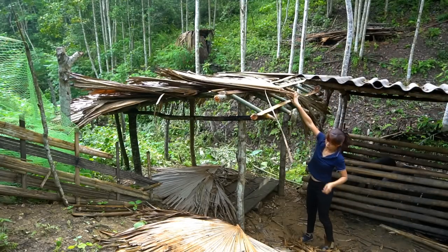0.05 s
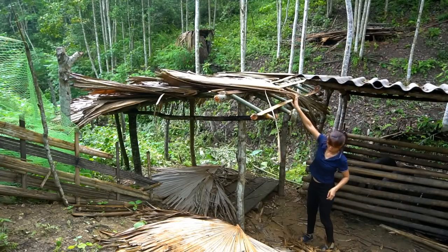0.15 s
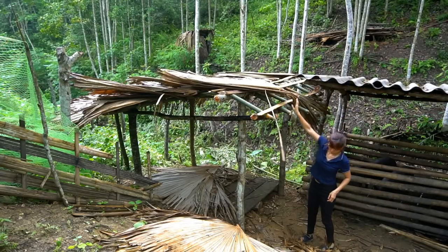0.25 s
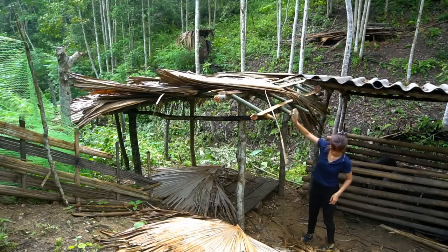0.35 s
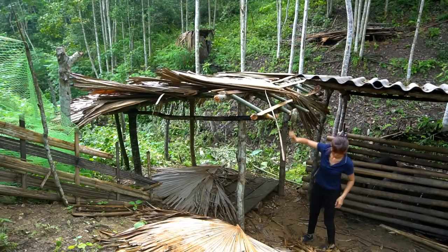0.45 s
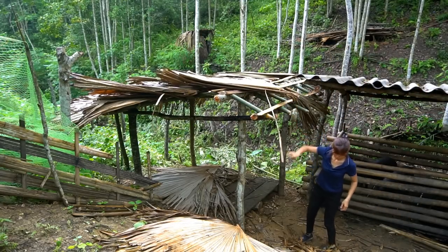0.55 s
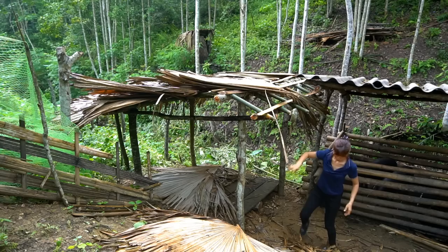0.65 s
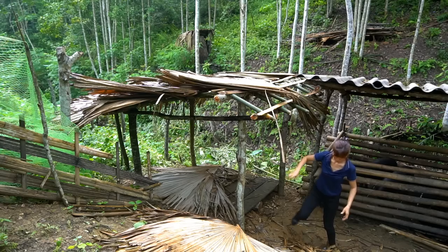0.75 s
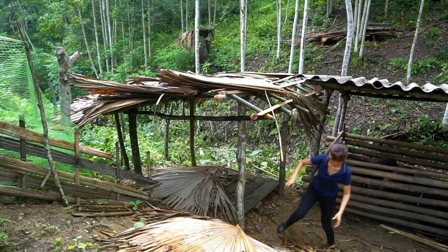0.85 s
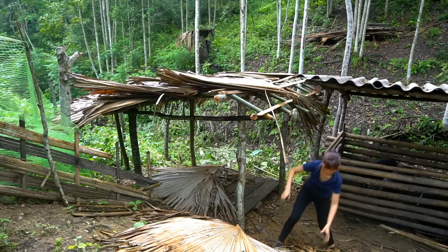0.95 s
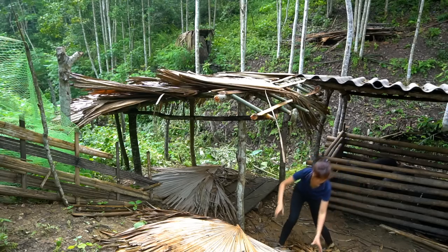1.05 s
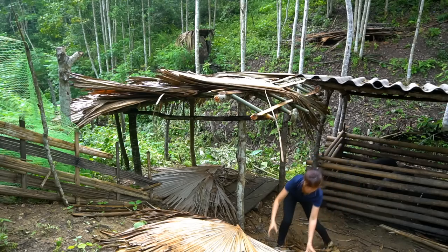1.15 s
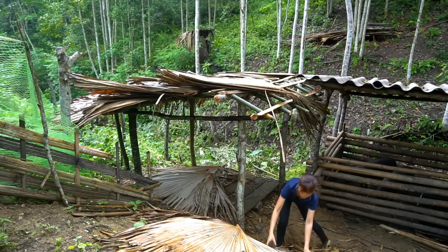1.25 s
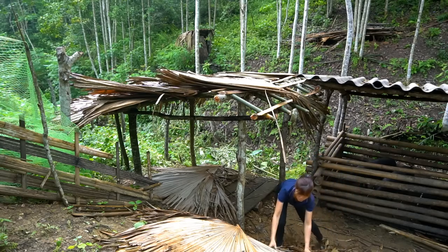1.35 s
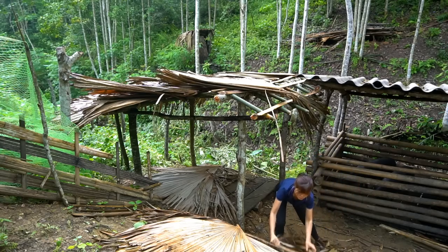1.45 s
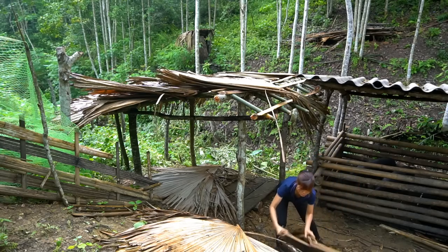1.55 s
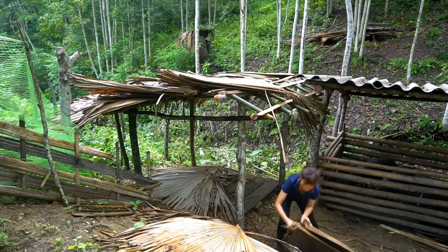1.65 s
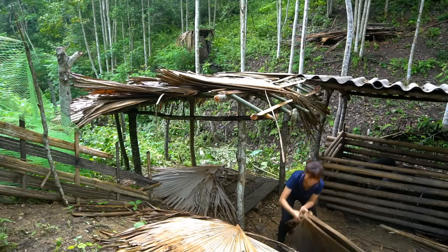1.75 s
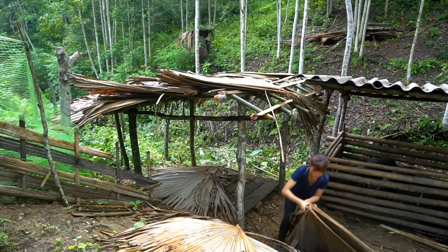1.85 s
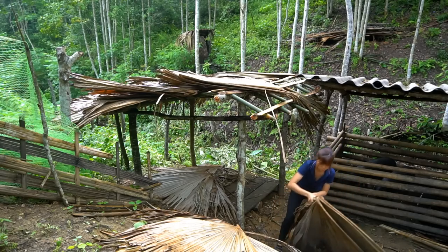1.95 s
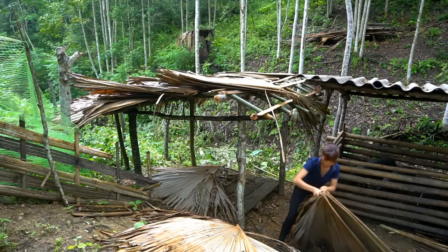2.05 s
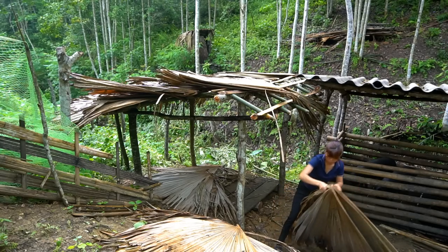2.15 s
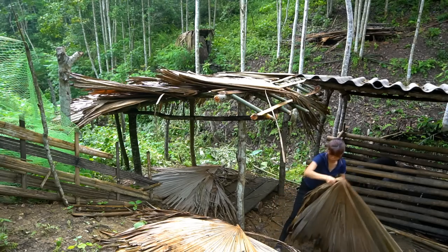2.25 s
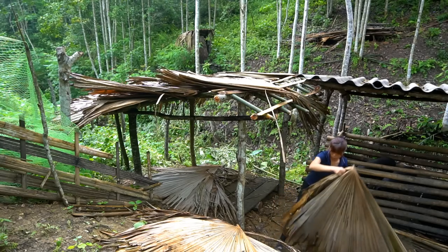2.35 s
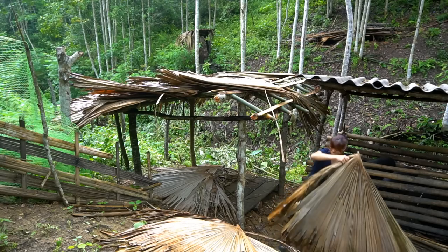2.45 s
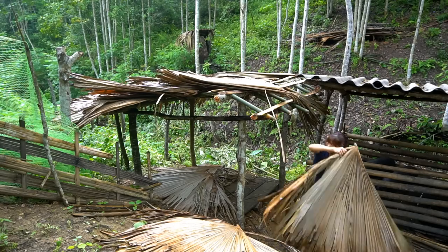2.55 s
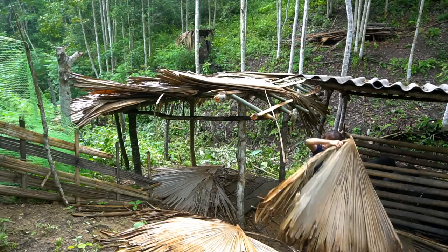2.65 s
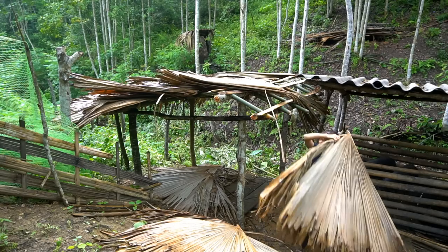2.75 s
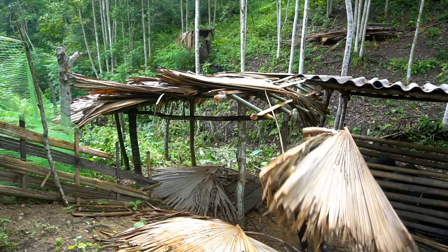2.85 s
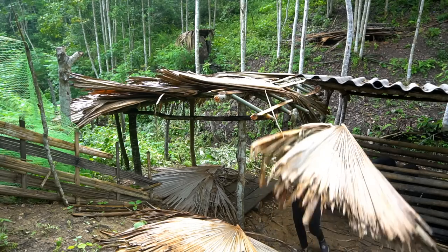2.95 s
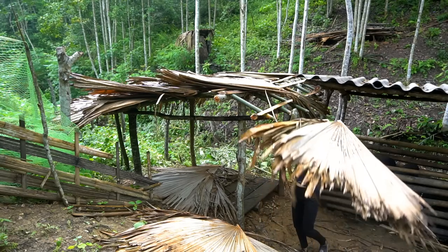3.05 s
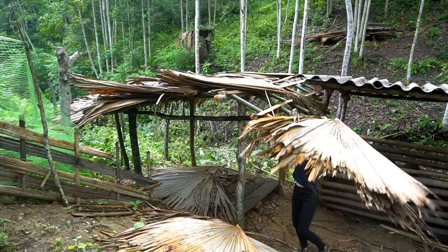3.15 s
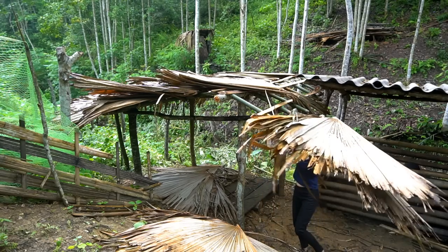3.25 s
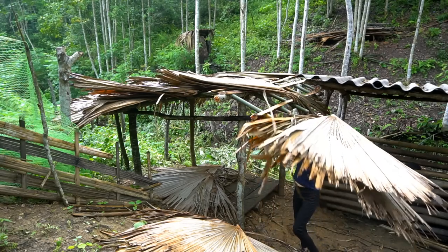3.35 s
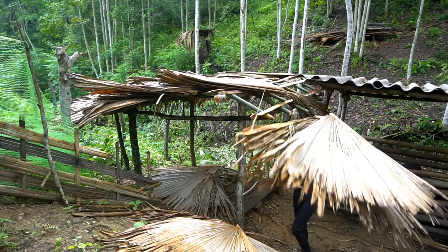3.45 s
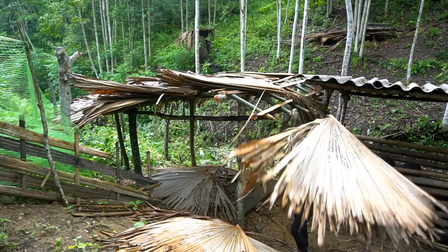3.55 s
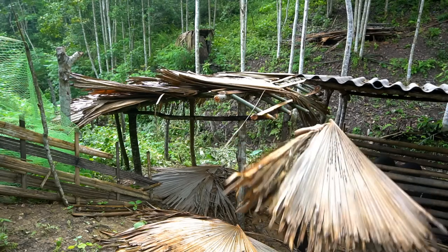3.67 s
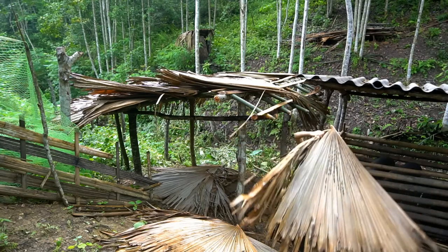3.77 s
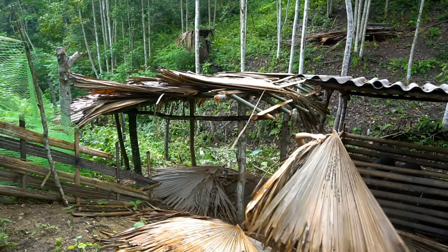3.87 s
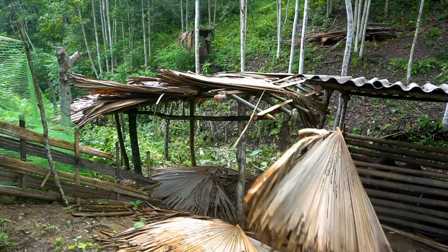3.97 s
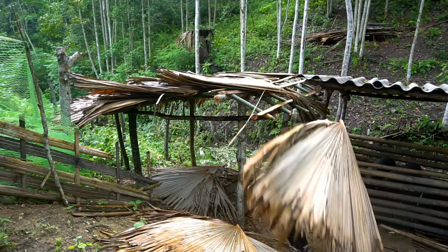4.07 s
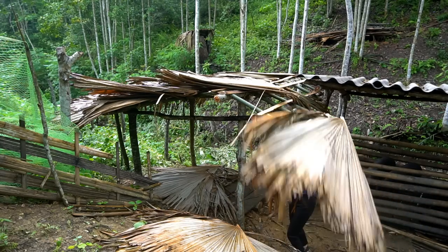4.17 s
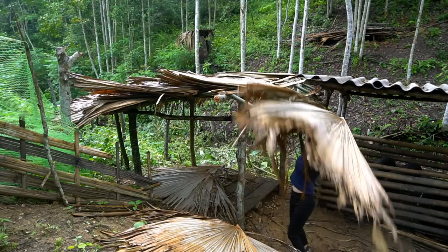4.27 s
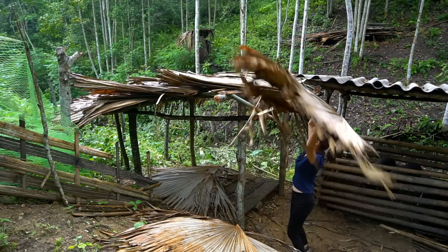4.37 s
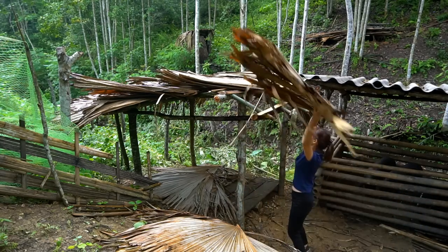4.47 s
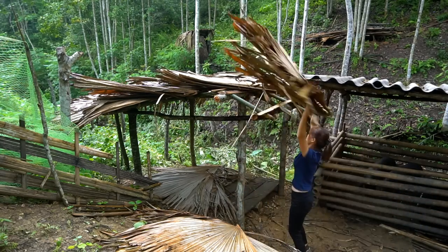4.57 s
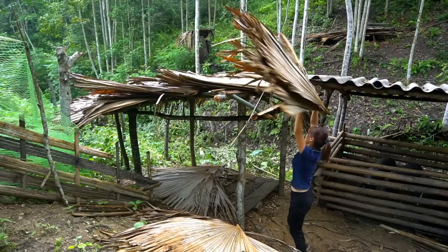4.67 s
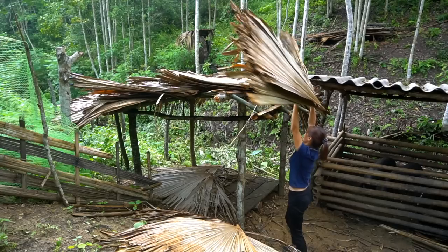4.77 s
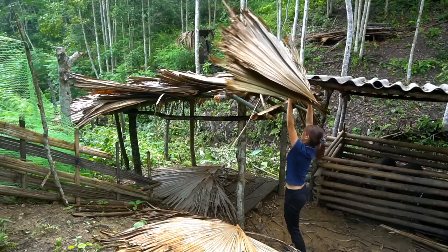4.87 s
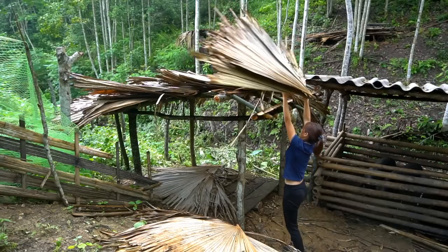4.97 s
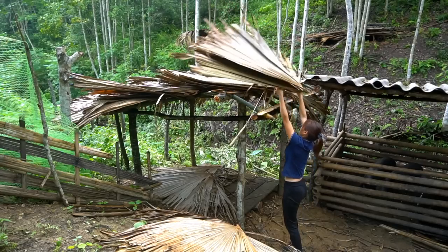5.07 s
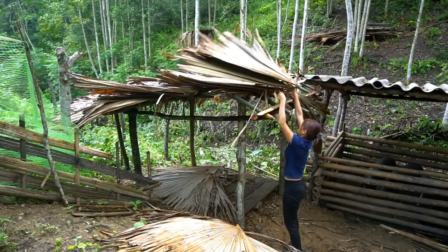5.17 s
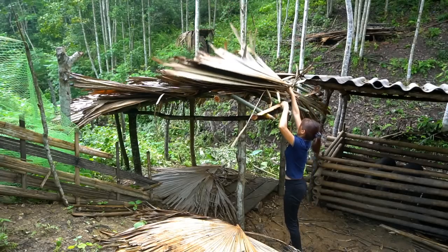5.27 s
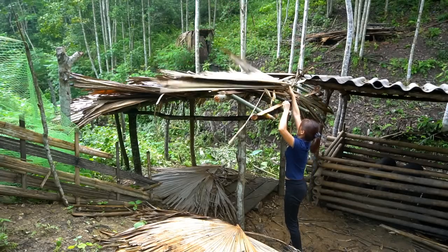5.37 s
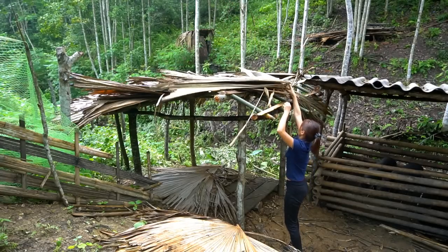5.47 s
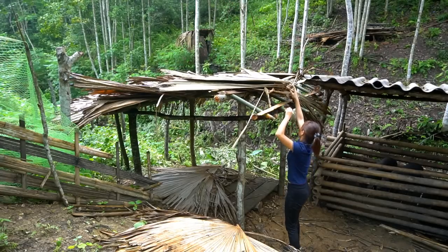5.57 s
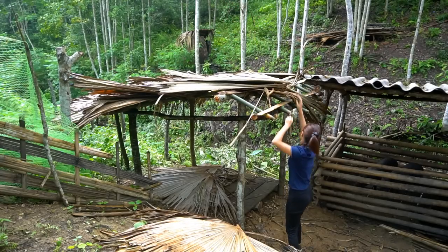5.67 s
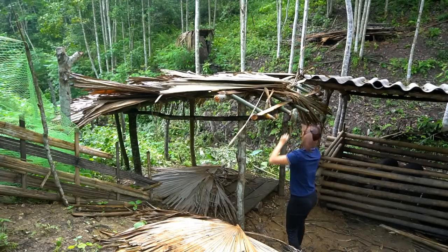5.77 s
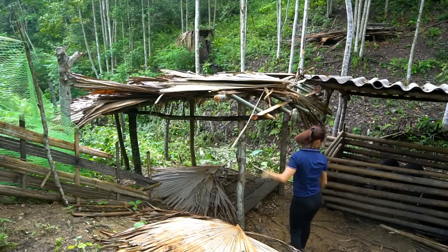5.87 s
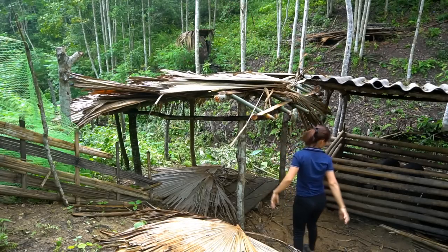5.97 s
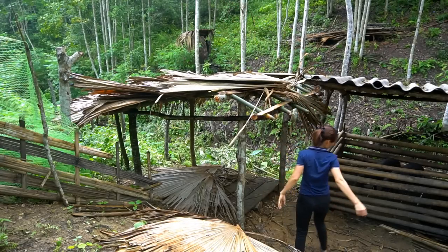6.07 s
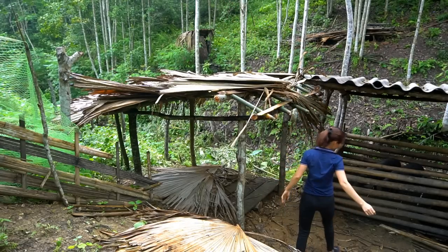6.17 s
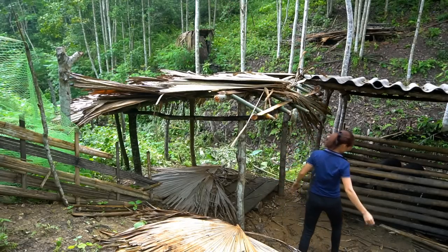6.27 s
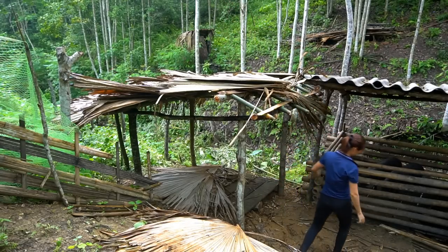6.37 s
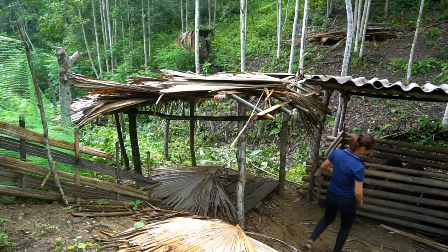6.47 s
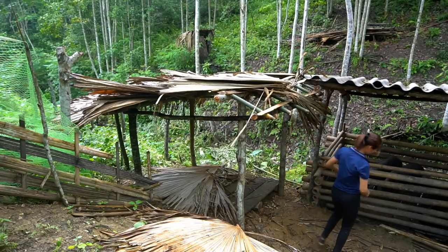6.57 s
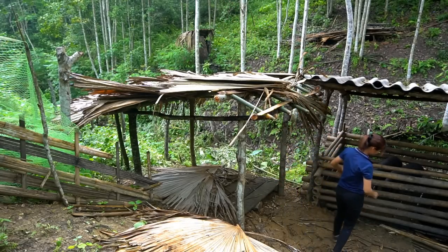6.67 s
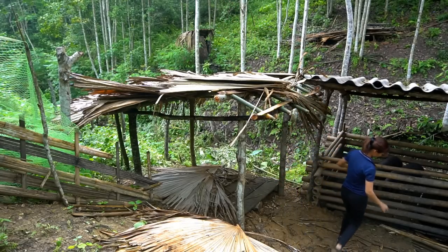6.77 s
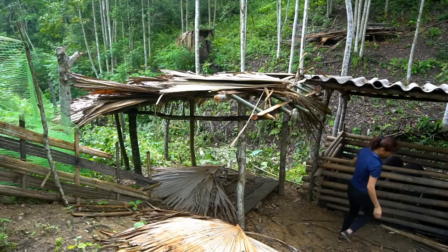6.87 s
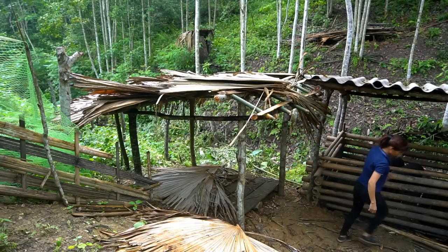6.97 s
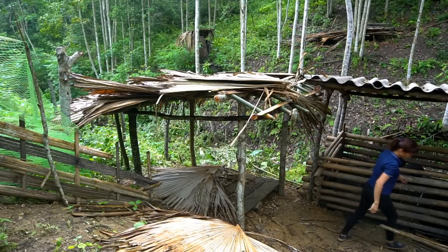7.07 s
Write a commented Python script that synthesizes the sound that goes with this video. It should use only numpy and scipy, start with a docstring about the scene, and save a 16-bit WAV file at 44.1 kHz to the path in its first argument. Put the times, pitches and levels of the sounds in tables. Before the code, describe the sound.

Outdoors among trees, insects buzz continuously, a nearer cicada swelling and pausing briefly around the middle. A stiff dried palm leaf is pulled from a pile in brittle rasping strokes, flaps and pops as it is turned, cracks hard when thrown up, then rasps into place on a leafy roof. Faint knocks and dull earth steps; high birds chirp. Wide stereo, moderately distant, with light scattered echoes.

```python
"""First one hears cicadas droning all around; then a dry fan-palm leaf is pulled off a pile, swung
overhead and slid onto a thatched roof. Filtered random fractures make its scrape and crackle, damped
modes its snapping ribs, resonant noise bursts its slaps, its stalk's knocks and soft steps on bare earth.
A nearer cicada (beating noise) swells and pauses, an insect trills on narrow noise bands, and distant
birds (sines) and chirping insects (resonant noise) sound through scattered echoes."""
import sys
import numpy as np
from scipy import signal
from scipy.fft import rfft, irfft
from scipy.io import wavfile

SR = 44100
rng = np.random.default_rng(int(sys.argv[2]) if len(sys.argv) > 2 else 0)


def to_wav(sig):
    """Store sig (one row per channel, or 1-D mono) as 16-bit WAV at the path in sys.argv[1].

    Samples outside -1..1 are clipped; the rate is SR.
    """
    pcm = np.clip(np.atleast_2d(sig), -1, 1) * 32767
    pcm = np.round(pcm).astype(np.int16)
    wavfile.write(sys.argv[1], SR, pcm.T)  # frames by channels


N = 313988
TIME, HZ = np.arange(N) / SR, np.fft.rfftfreq(N, 1 / SR)

# Relative spectra of the leaf's scrape, crackle and low flexing: (frequency [Hz], density [dB per Hz])
SCRAPE_SPECTRUM = [(150, -23), (350, -9), (550, -2), (950, 0.5), (1600, -3), (2700, -1.5), (4500, -6),
                   (8000, -5), (15500, -22.5)]
CRACKLE_SPECTRUM = [(600, -16.5), (2000, -3.5), (4200, 0.5), (7000, -4.5), (11000, -9), (15500, -14.5)]
FLEX_SPECTRUM = [(20, -26), (45, -8.5), (80, -5.5), (135, 1.5), (170, -8), (225, 3.5), (310, 0.5),
                 (420, 0.5), (800, -21)]
# Strokes of the leaf over the pile, the arms and the roof, levels before the trims in rustle():
# (start [s], length [s], scrape [dB], flexing of the fan [dB], crackle of the tips [dB])
STROKES = [(1.476, 0.41, -57, -69, -71), (1.93, 0.26, -62.5, -68, -72), (2.264, 0.25, -56.5, -61.5, -77),
           (2.602, .22, -54, -61.5, -75), (3.837, 0.089, -57, -68, -76), (4.004, 0.12, -58, -67, -66.5),
           (4.466, 0.06, -54.5, -73, -63.5), (4.64, .04, -59, -72, -70), (4.812, .07, -62.5, -77, -68),
           (4.956, 0.1, -60.5, -78, -68), (5.177, 0.23, -62, -67, -68.5), (5.377, 0.16, -52.5, -64, -68),
           (5.443, 0.091, -51, -65, -63), (5.57, 0.055, -71, -82, -65)]
GRIP_S, LET_GO_S = 0.023, 0.061  # rise time and release time constant of a stroke
# Soft stirring of the carried leaf, before the same trims: (scrape [dB], flexing [dB], crackle [dB])
CARRY_LEVELS = (-66.5, -77, -73)
CARRY_FROM_S, CARRY_TO_S, CARRY_EDGE_S = 1.337, 5.66, 0.076
# Ribs snapping, splintering before the trim in snaps():
# (time [s], crack level [dB], ring frequency [Hz], splintering level [dB])
SNAPS = [(1.1, -43, 5000, -41), (1.6118, -23, 6500, -35), (1.622, -27.5, 3900, -39),
         (1.982, -40, 5000, -38), (2.115, -38.5, 8000, -41), (2.254, -26.5, 4380, -30),
         (2.659, -32, 4200, -50), (2.797, -36, 3220, -34), (3.612, -35, 5000, -29), (3.866, -29, 6400, -32),
         (3.884, -28.5, 4700, -48), (4.335, -30, 3770, -49), (4.4517, -16, 3800, -25),
         (4.4598, -32, 5000, -45), (4.4688, -26, 4700, -31), (4.656, -50, 3000, -34.5),
         (4.801, -37, 7000, -45), (5.393, -32, 5000, -38), (5.527, -41, 3800, -40), (6.078, -48, 4200, -61)]
# Modes of a broken rib: (share of the ring frequency [ratio], level [dB], decay time constant [s])
RIB_MODES = [(1, -2.5, .0006), (0.598, -12.5, .0011)]
CRACK_RISE_S = 0.0002
# Dry blades slapping and brushing: (time [s], level [dB], centre [Hz], decay time constant [s])
SLAPS = [(0.0, -59, 804, 0.066), (.34, -64, 1000, 0.058), (.385, -64.5, 1000, 0.036),
         (1.094, -64.5, 900, 0.017), (1.812, -56, 420, 0.056), (2.254, -47.5, 1290, 0.017),
         (2.708, -47.5, 1200, 0.023), (2.760, -46.5, 1110, 0.029), (3.140, -44, 1390, 0.0089),
         (3.161, -56, 1900, 0.0075), (3.610, -47, 553, 0.0078), (3.652, -47.5, 657, 0.0084),
         (3.895, -59, 550, 0.017), (4.018, -46, 1010, 0.011), (4.046, -50, 1100, 0.0084),
         (4.088, -50, 2000, 0.021), (4.334, -43, 1390, 0.004), (4.4535, -50, 780, 0.029),
         (5.524, -44, 1300, 0.021)]
# Hard stalk on poles and other stalks: (time [s], level [dB], ring frequency [Hz], decay time constant [s])
KNOCKS = [(3.611, -58, 437, 0.016), (3.893, -58, 530, 0.019), (5.175, -55, 1770, 0.021),
          (6.585, -62, 1410, 0.029)]
# Thuds of feet and of the leaf's weight: (time [s], level [dB], centre [Hz], decay time constant [s])
THUDS = [(.368, -68, 60.6, 0.06), (.54, -69, 90, 0.035), (1.09, -65.5, 170, 0.024), (1.81, -64, 130, .05),
         (2.652, -55.5, 110, 0.025), (2.76, -61, 190, 0.023), (3.3, -68.5, 90, 0.04),
         (3.478, -67, 152, 0.037), (6.82, -68.5, 110, 0.068)]
# Left-right correlation of the leaf: (frequency [Hz], correlation [0-1])
LEAF_CORRELATION = [(60, 1), (290, 1), (640, 0.82), (1410, 0.24), (3100, 0.8), (6800, 0)]
# Lateral balance of the leaf: (frequency [Hz], left minus right [dB])
LEAF_BALANCE = [(100, -1), (380, -0.5), (1100, -2.9), (2400, -4.5), (8000, -1)]
# Relative spectrum of the near cicada: (frequency [Hz], density [dB per Hz])
CICADA_SPECTRUM = [(4500, -63), (5700, 8.5), (6250, 8), (6800, -16), (8300, 5.5), (9400, 3.5), (10500, 5),
                   (11200, 2.5), (12200, -3.5), (13200, -11.5), (15500, -20)]
# Phrases of the near cicada: (start [s], climax [s], end [s], level at the climax [dB])
PHRASES = [(-.3, 2.7, 3.33, -53.5), (3.58, 5.43, 7.1, -56)]
SWELL_DB_PER_S, TIRE_DB_PER_S = 2.3, 2.5  # rise before the climax, fall after it
SONG_ATTACK_S, SONG_RELEASE_S = 0.11, 0.06
# Bouts of an insect trilling on one note: (start [s], end [s], level [dB])
TRILL_BOUTS = [(-.2, 3.38, -65), (3.55, 6.1, -66), (6.3, 6.6, -70)]
# Two close lines of the trill: (frequency [Hz], -3 dB width [Hz], relative level [dB])
TRILL_LINES = [(2894, 98, 0.5), (3000, 75, -3)]
# Distant bird whistles, levels before echoes: (time [s], length [s], frequency [Hz], level [dB])
WHISTLES = [(.63, .07, 6190, -60), (.75, .06, 6300, -62), (2.58, 0.095, 4210, -60),
            (2.94, 0.066, 6230, -59.5), (5.054, .08, 6260, -64), (5.165, 0.055, 6250, -57),
            (6.35, .18, 4210, -59), (6.68, 0.085, 3737, -59.5), (6.716, .06, 3020, -64),
            (6.833, .11, 4750, -56.5)]
# Runs of shrill chirps, before echoes, the end itself excluded:
# (first chirp [s], end [s], spacing [s], frequency [Hz], level [dB])
CHIRPS = [(0.021, .5, 0.15, 5080, -56.5), (4.047, 4.72, 0.2, 5100, -64)]
# Cicada choirs: (frequency [Hz], -3 dB width [Hz], level [dB], mean throb rate [1/s], throb swing [dB])
CHOIRS = [(2360, 210, -75.5, 3, -0.5), (2660, 91, -75.5, 4, 5.5), (4037, 510, -59, 4.9, 1.5),
          (4724, 440, -57, 6.5, 2), (5414, 570, -54, 7.5, 0.73), (7146, 660, -55.5, 10, 0.5),
          (7685, 650, -56, 7.6, 0.84), (10280, 92, -74.5, 1.8, 11)]
# Relative spectrum of the forest's soft wash: (frequency [Hz], density [dB per Hz])
FOREST_SPECTRUM = [(20, -24), (55, -0.5), (130, 0), (260, 0), (600, 0), (1200, -2), (2000, -2), (3300, 7.5),
                   (5500, 9), (8400, 7), (10800, 5), (12500, -8), (15500, -10.5)]
FOREST_DB = -55.5
# Left-right correlation of the wash: (frequency [Hz], correlation [0-1])
FOREST_CORRELATION = [(60, .6), (130, 0.46), (290, 0), (640, 0)]
# Lateral balance of wash and choirs: (frequency [Hz], left minus right [dB])
FOREST_BALANCE = [(100, 0.5), (700, -2), (1300, -2.5), (2500, -6.5), (4400, -2), (8000, -1.5),
                  (15000, -0.5)]
EDGE_HZ = 15800  # upper band limit


def rustle():
    """Stick-slip friction: clumped fractures give dense scrape and sparse crackle; the fan flexes low."""
    scraping, flexing, crackling = handling()
    clumps = amp(1.4 * wander(hz=68) + 0.56 * wander(hz=23))
    scrape = colour(pair(grains(per_s=6000, spread_db=3.0), LEAF_CORRELATION), SCRAPE_SPECTRUM)
    scrape = scrape * scraping * amp(0.3)
    scrape = patchy(scrape, depth_db=1.95, width_hz=200, length_s=0.03)  # small patches of the scrape swell and fade in pitch and time
    crackle = colour(grains(per_s=1500, spread_db=2.0), CRACKLE_SPECTRUM) * crackling * amp(12.5)
    crackle = patchy(crackle, depth_db=2.5, width_hz=640, length_s=0.019)
    flex_noise = pair(rng.standard_normal((2, N)), LEAF_CORRELATION)
    flex = colour(flex_noise, FLEX_SPECTRUM) * flexing * amp(-2.3)
    return clumps * (scrape + crackle) + flex


def handling():
    """Power addition: strokes add to the carried leaf's stirring; returns scrape, flex and crackle gains."""
    carrying = gate(CARRY_FROM_S, CARRY_TO_S, CARRY_EDGE_S, CARRY_EDGE_S)
    power = np.outer(amp(CARRY_LEVELS), carrying) ** 2
    for start, length, *levels_db in STROKES:
        power += np.outer(amp(levels_db), gate(start, start + length, GRIP_S, LET_GO_S)) ** 2
    return np.sqrt(power)


def grains(per_s, spread_db):
    """Impulsive excitation: random fractures, mostly small, reach the two sides with unlike strengths."""
    size = amp(spread_db * np.minimum(rng.exponential(1, N), 3))
    happens = rng.random(N) < per_s / SR
    return size * happens * rng.uniform(-0.89, 1, (2, N))


def snaps():
    """Modal decay: a breaking rib cracks and springs back in two modes, then its fibres splinter."""
    out, t = np.zeros((2, N)), np.arange(SR // 6) / SR
    for s, crack_db, hz, splinter_db in SNAPS:
        note = np.zeros(len(t))
        for share, db, decay_s in RIB_MODES:
            note += amp(db) * np.sin(2 * np.pi * hz * share * t) * np.exp(-t / decay_s)
        tear = ring(rng.standard_normal((2, len(t))), 6100, q=1.0) * np.exp(-t / 0.00057)
        crack = (note + tear) * (1 - np.exp(-t / CRACK_RISE_S))
        bursts = 0.35 + (rng.random(len(t)) < 0.02) * 1.1  # sparse stronger breaks
        fibres = rng.standard_normal((2, len(t))) * bursts
        fibres = ring(fibres, hz, q=0.73) + 0.23 * fibres
        fibres = unit(ring(fibres, hz, q=0.44)) * np.exp(-t / 0.015)
        add(out, s, amp(crack_db) * crack + amp(splinter_db - 12.5) * fibres)
    return out


def blows(rows, q, rise_s):
    """Resonant impact: a flurry of contacts, as decaying noise, excites the struck thing's broad resonance."""
    out, t = np.zeros((2, N)), np.arange(SR // 3) / SR
    for s, level_db, hz, decay_s in rows:
        contacts = ring(ring(rng.standard_normal((2, len(t))), hz, q), hz, q)
        envelope = np.exp(-t / decay_s) * (1 - np.exp(-t / rise_s))
        add(out, s, amp(level_db) * unit(contacts) * envelope)
    return pair(out, LEAF_CORRELATION)


def cicada():
    """Amplitude modulation: tymbal beats roughen a nearer cicada's buzz, which swells, tires and pauses."""
    tymbal_beat = np.sin(2 * np.pi * np.cumsum(210 * (1 + 0.1 * wander(hz=19.4))) / SR)
    buzz = colour((1 + 0.079 * tymbal_beat) * rng.standard_normal((2, N)), CICADA_SPECTRUM)
    song = np.zeros(N)
    for start, climax, end, level_db in PHRASES:
        effort_db = np.minimum(SWELL_DB_PER_S * (TIME - climax), TIRE_DB_PER_S * (climax - TIME))
        song += amp(level_db + effort_db) * gate(start, end, SONG_ATTACK_S, SONG_RELEASE_S)
    return buzz * song * pan(side_db=-5)


def trill():
    """Narrow-band noise: two close lines make one fluttering insect note, to the right, in bouts."""
    lines = sum(amp(level_db) * bell(hz, width_hz) for hz, width_hz, level_db in TRILL_LINES)
    note = irfft(rfft(rng.standard_normal((2, N))) * lines, N)
    flutter = unit(amp(1.2 * wander(hz=30.2)))
    bouts = np.zeros(N)
    for start, end, level_db in TRILL_BOUTS:
        bouts += amp(level_db) * gate(start, end, attack_s=0.11, release_s=0.14)
    return unit(note) * flutter * bouts * pan(side_db=-5.5)


def callers():
    """Tone and resonance: wavering sines whistle as birds, ringing noise chirps as insects, with echoes."""
    out = np.zeros((2, N))
    waver = wander(hz=60)
    for s, length, hz, level_db in WHISTLES:
        pitch = hz * (1 + 0.0025 * waver[round(s * SR):][:round(length * SR)])
        whistle = np.sin(2 * np.pi * np.cumsum(pitch) / SR)
        add(out, s, amp(level_db) * whistle * signal.windows.tukey(len(pitch), 0.2))
    for first, last, spacing, hz, level_db in CHIRPS:
        pulses = sum(np.exp(-((TIME - s) / 0.024) ** 2) for s in np.arange(first, last, spacing))
        rasp = unit(ring(ring(rng.standard_normal((2, N)), hz, q=12), hz, q=12))
        out += amp(level_db) * pulses * rasp
    return clearing(out, wet_db=0, t60=0.45)


def forest():
    """Incoherent summation: distant cicadas blur into throbbing tymbal-resonance bands over a soft wash."""
    wash = pair(rng.standard_normal((2, N)), FOREST_CORRELATION)
    out = amp(FOREST_DB) * colour(wash, FOREST_SPECTRUM)
    for hz, width_hz, level_db, rate, throb_db in CHOIRS:
        band = irfft(rfft(rng.standard_normal((2, N))) * bell(hz, width_hz), N)
        phase = 2 * np.pi * np.cumsum(rate * (1 + 0.25 * wander(hz=2))) / SR
        throb = np.sin(phase) + 0.4 * wander(hz=20)
        out += unit(band * amp(throb_db * throb)) * amp(level_db)
    return balance(out, FOREST_BALANCE)


def clearing(x, wet_db, t60, count=5):
    """Multipath reflection: sparse decaying echoes, from ground, shed and trunks, in sets that take turns."""
    t = np.arange(SR // 2) / SR
    out = x
    for k in range(count):
        arrives = (rng.random((2, len(t))) < 2000 / SR) * (t > 0.004)
        taps = rng.standard_normal((2, len(t))) * arrives * 1000 ** (-t / t60)  # 60 dB down at t60 seconds
        taps /= np.linalg.norm(taps, axis=1, keepdims=True)
        # the sets peak one after another, twelve a second
        turn = np.abs((TIME * 12 - k + 1) % count - 1)
        fed = x * np.cos(np.pi / 2 * np.minimum(turn, 1))
        out = out + amp(wet_db) * signal.oaconvolve(fed, taps, axes=1)[:, :N]
    return out


def patchy(x, depth_db, width_hz, length_s):
    """Random fluctuation: small time-frequency regions swell and fade, making the texture uneven."""
    z = signal.stft(x, nperseg=512, noverlap=384)[2]
    field = rng.standard_normal(z.shape[1:])
    reach = np.arange(-40, 41)  # bins or frames
    for axis, span in enumerate([width_hz * 512 / SR, length_s * SR / 128]):
        smoother = np.expand_dims(np.exp(-2 * (reach / span) ** 2), 1 - axis)
        field = signal.oaconvolve(field, smoother, "same")
    gains = unit(amp(depth_db * unit(field)))
    return signal.istft(z * gains, nperseg=512, noverlap=384)[1][:, :N]


def pair(x, likeness):
    """Interaural correlation: blends two unrelated channels to a given likeness at each frequency."""
    angle = np.arcsin(np.clip(spectrum(likeness), -1, 1)) / 2
    z = rfft(x)
    return irfft(np.cos(angle) * z + np.sin(angle) * z[::-1], N)


def balance(x, side):
    """Level difference by frequency: left minus right, split evenly between the channels."""
    return irfft(rfft(x) * amp(np.outer([0.5, -0.5], spectrum(side))), N)


def pan(side_db):
    """Level difference: left and right gains, left minus right in dB."""
    return amp([[side_db / 2], [-side_db / 2]])


def ring(x, hz, q):
    """Damped resonance: one two-pole peak of quality q."""
    return signal.lfilter(*signal.iirpeak(min(hz, SR / 4), max(q, 0.5), SR), x)


def bell(hz, width_hz):
    """Gaussian band: gain over frequency, 3 dB down at the edges of its full width."""
    return 2 ** (-2 * ((HZ - hz) / width_hz) ** 2)


def colour(x, points):
    """Spectral shaping: filters x by a dB curve and scales it to rms 1."""
    return unit(irfft(rfft(x) * amp(spectrum(points)), N))


def spectrum(points):
    """Logarithmic frequency scale: interpolates (frequency [Hz], value) rows."""
    hz, value = np.transpose(points)
    return np.interp(np.log(HZ + 1), np.log(hz), value)


def wander(hz):
    """Low-passed noise: slow chance of rms 1, moving up to about hz times a second."""
    return unit(irfft(rfft(rng.standard_normal(N)) / (1 + (HZ / hz) ** 4), N))


def gate(start, end, attack_s, release_s):
    """Envelope: linear attack, hold and exponential release over the whole scene."""
    return np.clip((TIME - start) / attack_s, 0, 1) * np.exp(-np.maximum(TIME - end, 0) / release_s)


def amp(db):
    """Decibel law: level to amplitude gain."""
    return 10 ** (np.asarray(db) / 20)


def unit(x):
    """Normalisation: scales to rms 1."""
    return x / np.sqrt(np.mean(x ** 2) + 1e-20)


def add(mix, s, sound):
    """Superposition: lays a sound into the mix at time s."""
    part = mix[:, max(round(s * SR), 0):][:, :sound.shape[-1]]
    part += sound[..., :part.shape[1]]


def scene():
    """Superposition: the leaf, a little to the right, and the steps amid the forest's insects and birds."""
    slaps = blows(SLAPS, q=0.17, rise_s=0.0011)
    knocks = blows(KNOCKS, q=2.5, rise_s=0.002)
    leaf = rustle() + slaps + knocks + snaps() * pan(side_db=-3.5)
    leaf = balance(clearing(leaf, wet_db=-7.5, t60=0.13), LEAF_BALANCE)
    steps = blows(THUDS, q=0.58, rise_s=0.0023)
    insects = patchy(forest() + cicada(), depth_db=1.85, width_hz=47, length_s=0.029)
    return leaf + steps + insects + trill() + callers()


def record(dry):
    """Band limitation: a linear-phase low-pass removes the highest treble."""
    low_pass = signal.firwin(1023, EDGE_HZ, window=("kaiser", 9), fs=SR)
    return signal.oaconvolve(dry, low_pass[None], "same")


dry = scene()
out = record(dry)
to_wav(out)
```